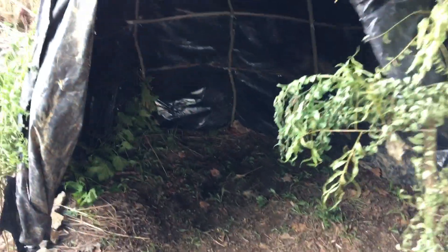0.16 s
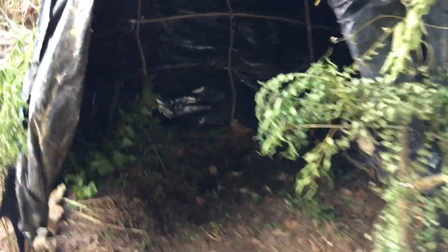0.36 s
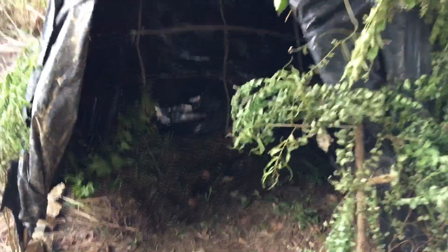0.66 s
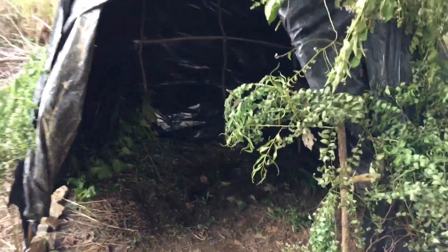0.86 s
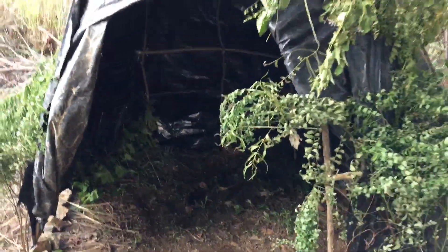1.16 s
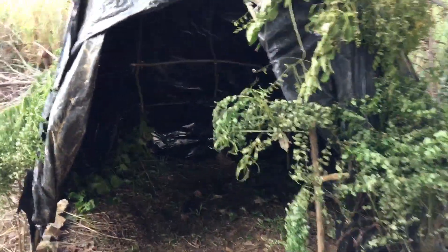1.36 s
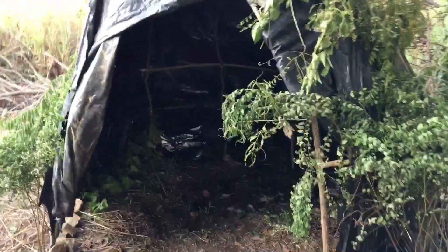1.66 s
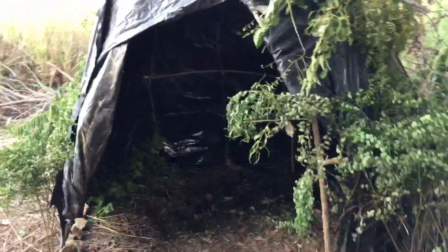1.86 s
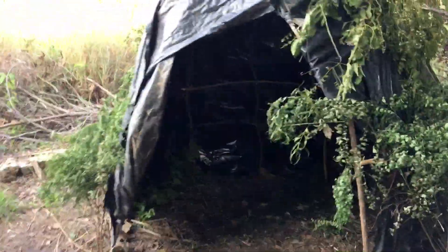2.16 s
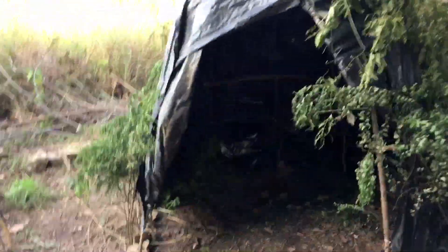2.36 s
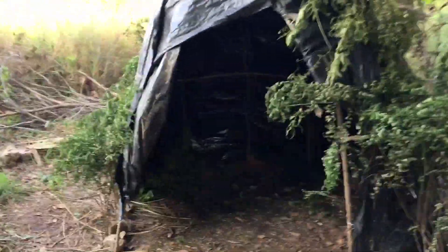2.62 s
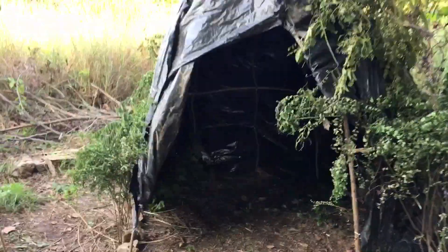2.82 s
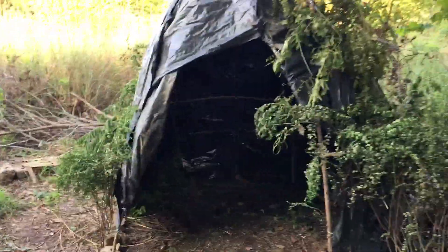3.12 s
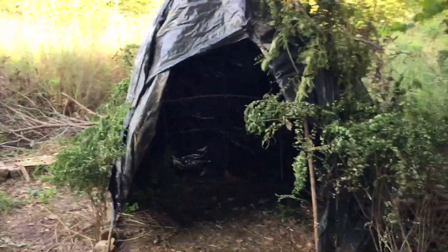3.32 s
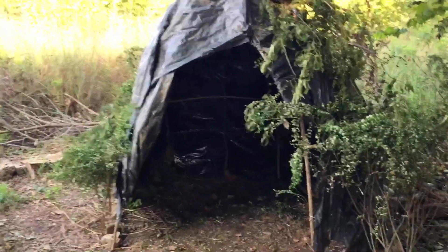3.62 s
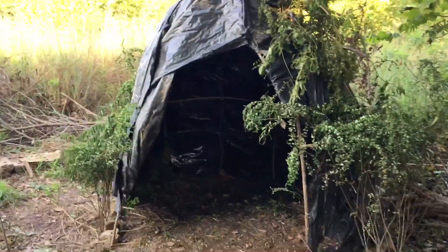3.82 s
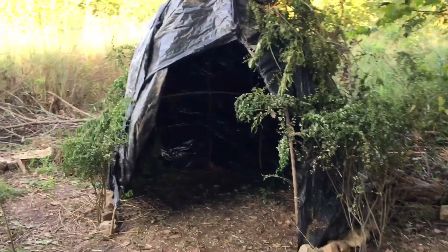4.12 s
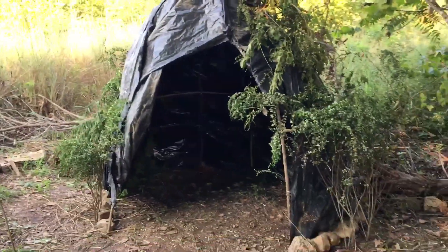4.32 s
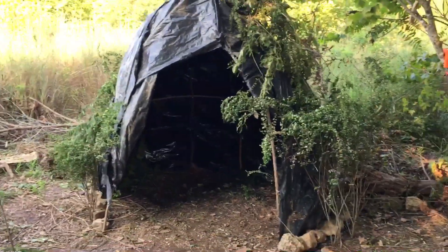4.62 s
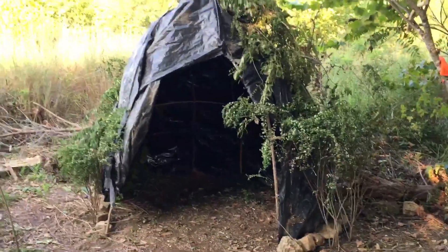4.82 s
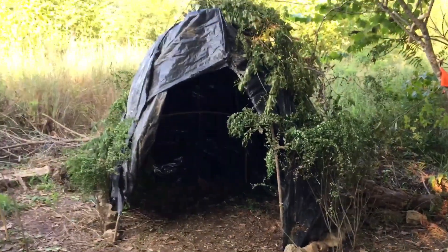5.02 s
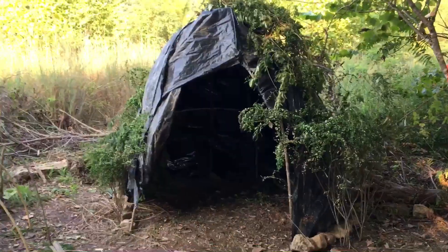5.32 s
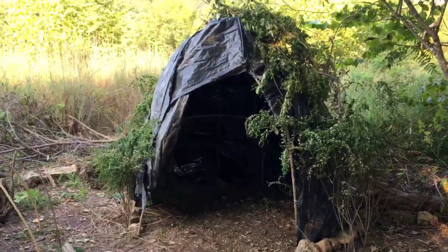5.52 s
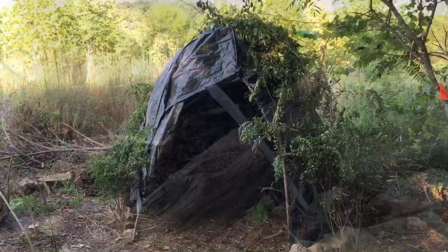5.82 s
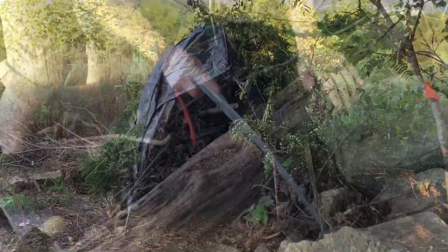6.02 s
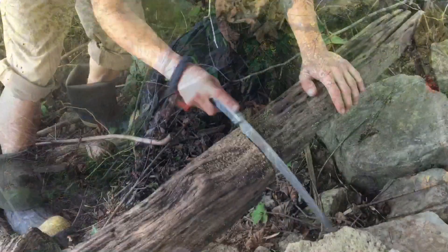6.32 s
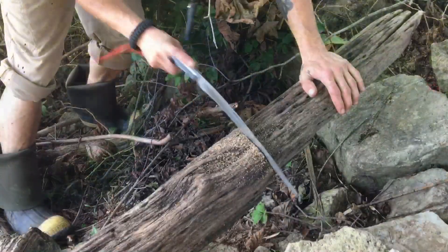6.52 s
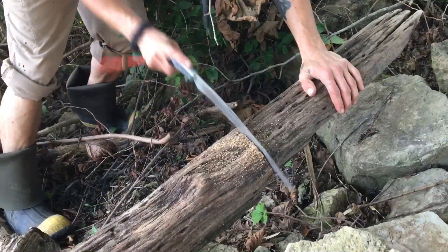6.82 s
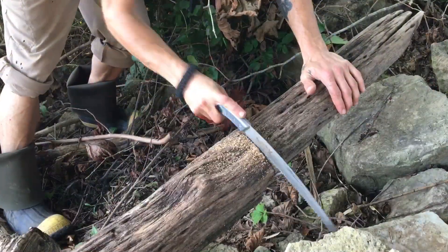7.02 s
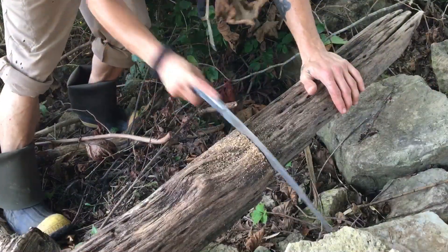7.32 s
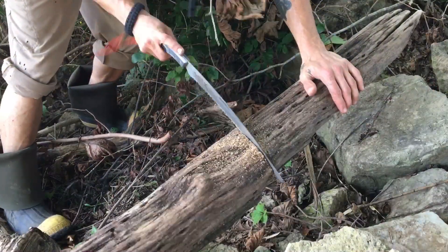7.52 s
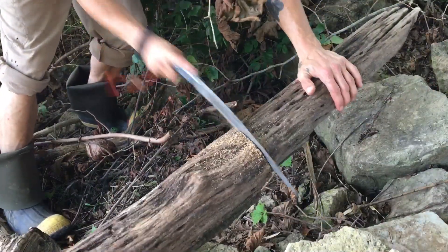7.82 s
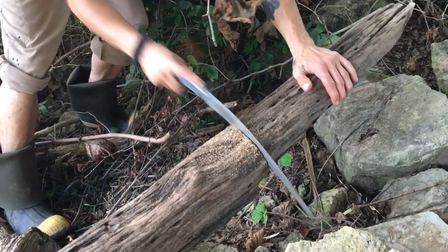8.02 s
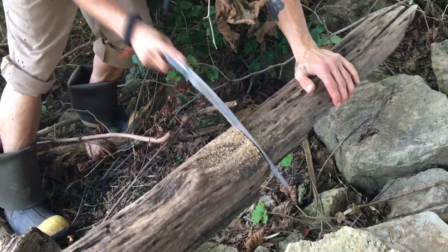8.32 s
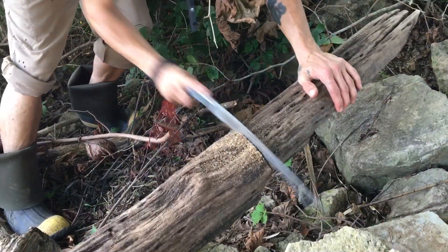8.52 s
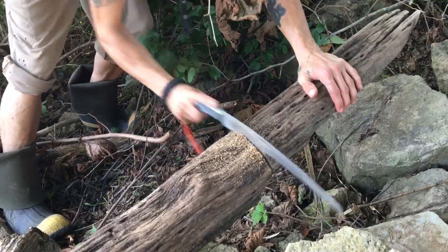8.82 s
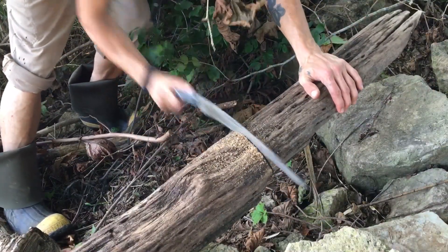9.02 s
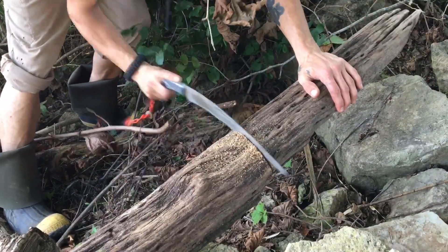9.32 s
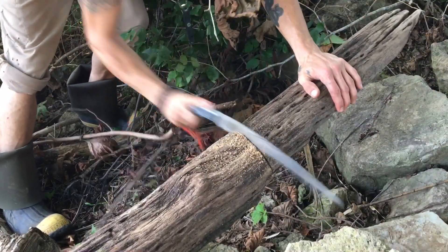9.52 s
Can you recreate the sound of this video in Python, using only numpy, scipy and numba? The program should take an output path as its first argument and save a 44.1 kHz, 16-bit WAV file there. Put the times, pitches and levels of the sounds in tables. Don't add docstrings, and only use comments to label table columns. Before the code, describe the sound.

Boots rustle leaf litter and snap twigs while a far motorbike revs, then a hand saw rasps through a dry log in fast strokes.

```python
import sys
import numpy as np
from scipy import signal
from scipy.fft import rfft, irfft
from scipy.io import wavfile
from scipy.ndimage import uniform_filter1d
from numba import njit

SR = 44100
rng = np.random.default_rng(int(sys.argv[2]) if len(sys.argv) > 2 else 0)


def master_out(mix):
    frames = np.transpose(np.atleast_2d(mix))
    ceiling = np.clip(frames, -1, 1)
    pcm = np.round(ceiling * 32767).astype(np.int16)
    wavfile.write(sys.argv[1], SR, pcm)


def rack_gain(trim_db):
    fader = np.asarray(trim_db, float)
    return 10 ** (fader / 20)


N = 426006
SHORE_FROM_S = 5.672

# teeth bite at t/s, held/s, cutting level/dB, change while held/dB, fine tearing/dB
PULLS = [(5.736, 0.069, -34.5, -7.5, -1.5), (6.122, 0.078, -37, -4, -4), (6.473, 0.065, -31, -4.5, -2),
         (6.806, 0.086, -33.5, -2.5, -2.5), (7.19, 0.069, -29.5, -8, -2), (7.488, 0.078, -33.5, -2.6, -2.5),
         (7.866, 0.072, -30.5, -4, -5), (8.272, 0.063, -33, -4, -5.5), (8.6, 0.068, -30, -3, -4),
         (8.925, 0.072, -32, -0.1, -6), (9.283, 0.069, -32, -1, 0), (9.616, 0.057, -31.5, -1, -2.5)]
PUSHES = [(5.64, 0.018, -40, -1.5, 7), (5.934, 0.053, -41.5, -0.5, -2.5), (6.328, 0.036, -35, -0.5, -5),
          (6.654, 0.048, -37.5, 0.9, -5.5), (7.02, 0.037, -34.5, 2, -5), (7.37, 0.03, -38, 1, -7),
          (7.714, 0.054, -34, -7, -6), (8.08, 0.054, -38, -3, -6.5), (8.435, 0.047, -39.5, 6.5, -5.5),
          (8.78, 0.041, -38.5, 2, -3.5), (9.12, 0.052, -38, 1, 1), (9.46, 0.05, -39, 5, -0.5)]
# press-in/s, lift-off/s
PULL_EASE = [(0.079, 0.041), (0.096, 0.04), (0.077, 0.036), (0.07, 0.055), (0.065, 0.032), (0.04, 0.038),
             (0.064, 0.028), (0.069, 0.034), (0.073, 0.055), (0.057, 0.046), (0.063, 0.052), (0.062, .03)]
PUSH_EASE = [(.09, 0.055), (.09, 0.1), (.09, 0.067), (.09, 0.069), (.09, 0.063), (.09, 0.071), (.09, 0.057),
             (.09, 0.052), (.1, .08), (.09, 0.061), (.09, 0.076), (.09, 0.059)]
# t/s, extra level/dB
CATCHES = [(5.673, 13), (5.703, 16), (5.901, 4), (5.93, 6), (6.095, 4), (6.119, 7), (6.434, 11), (6.449, 6),
           (6.471, 5), (6.77, 14), (6.783, 8), (6.991, 5), (7.169, 6), (7.184, 6), (7.193, 0), (7.832, 4),
           (7.854, -7), (7.866, 2), (7.475, 0), (7.485, 1), (8.234, 9), (8.251, -8), (8.272, -3),
           (8.573, 7), (8.597, 2), (8.753, 12), (8.909, 4), (8.92, 4), (9.104, 3), (9.128, -2), (9.181, 6),
           (9.265, 6), (9.288, 3), (9.314, 4), (9.471, 4), (9.602, 1), (9.613, 4)]
# f/Hz, level per Hz/dB
RASP_COLOUR = [(120, -25), (200, 0.5), (281, -12.5), (379, -2), (497, -8), (620, -4.5), (820, -1.5),
               (1030, 2), (1150, -5.5), (1450, 0.5), (1920, -2.5), (4920, -18), (6000, -10), (7800, -22),
               (13200, -120)]
# f/Hz, level per Hz/dB
TEAR_COLOUR = [(2650, -6), (4500, -4), (4920, -7), (5960, -1.5), (7690, -4.5), (9210, 0), (10400, -3),
               (11700, -0.5), (15100, -7), (16000, 5)]
# f/Hz, width/Hz, level/dB
LOG_MODES = [(1050, 30, -16), (1383, 110, -11.5), (2600, 170, -7), (3620, 310, -13.5)]
# t/s, length/s, f/Hz,
# width/Hz, level/dB
SAW_RINGS = [(5.755, 0.021, 3730, 200, -44), (6.13, 0.03, 1970, 200, -40.5),
             (6.495, 0.027, 2310, 150, -38), (6.52, 0.044, 1070, 90, -46), (6.52, 0.042, 3380, 120, -54),
             (6.675, .04, 1050, 90, -53), (6.81, 0.028, 1980, 200, -42), (6.845, .035, 2650, 150, -40),
             (7.1138, .007, 4080, 350, -35), (7.167, 0.015, 1050, 300, -34),
             (7.18, 0.022, 1640, 300, -33), (7.485, 0.026, 980, 120, -41.5),
             (7.53, 0.035, 3930, 150, -43), (7.99, 0.02, 300, 250, -45), (7.905, 0.038, 3950, 120, -44),
             (8.31, .04, 3930, 120, -47), (8.575, 0.056, 1720, 199, -38), (8.8, 0.025, 5960, 500, -40),
             (8.828, 0.014, 5180, 200, -42), (8.915, 0.023, 1510, 200, -36.5),
             (9.15, 0.044, 865, 121, -45), (9.285, 0.017, 826, 120, -39), (9.305, 0.022, 1950, 200, -41),
             (9.33, 0.025, 1020, 120, -39), (9.35, .02, 1350, 150, -40), (7.53, 0.033, 360, 100, -42),
             (8.45, 0.023, 387, 120, -45), (8.655, 0.031, 377, 120, -41.5)]
# t/s, peak level/dB, f/Hz, t60/s, crack level/dB
KNOCKS = [
    (5.027, -36, 583, 0.029, 8),
    (5.036, -42, 344, 0.053, 10),
    (5.095, -32.5, 450, 0.037, 8),
    (5.107, -43, 604, 0.069, 6),
    (5.673, -60, 386, 0.011, 12),
    (7.1135, -31.5, 790, 0.011, 11),
    (8.523, -30.5, 330, 0.03, 19),
]

# loudest at t/s, level/dB, top above it/dB, swell/s, fade/s (both over 30 dB)
SCUFFS = [(0, -48, -10.5, .01, 0.38), (.1, -53, -5.5, 0.33, 0.21), (.2, -62, -7, .3, .09),
          (.41, -57, -19, 0.047, 0.071), (.594, -62.5, -22, 0.12, 0.13), (.988, -62, -7, .1, 0.14),
          (1.172, -69, -22, .11, .08), (1.42, -65, -14, 0.1, 0.18), (1.85, -59, -6.5, 0.15, 0.19),
          (2.13, -66, -7, .04, 0.24), (2.441, -35, -11.5, 0.086, 0.095), (2.6, -69, -6, 0.25, 4.1),
          (3.19, -59, -15, 0.096, 0.51), (3.232, -62, -12, .04, 0.09), (3.31, -57.5, -14, 0.089, .2),
          (3.355, -57.5, -14, 0.16, 0.31), (3.475, -50.5, -14, 0.094, 0.36), (3.545, -44, -12, 0.098, 0.11),
          (3.615, -60, -8, .08, .08), (4.06, -59.5, -7, 0.12, 0.17), (4.13, -61.5, -11, 0.11, 0.14),
          (4.225, -58, -12, 0.075, .2), (4.26, -58, -9, .1, 0.14), (4.33, -61.5, -12, .1, 0.11),
          (4.392, -58.5, -3, 0.053, 0.14), (4.425, -56, -5, 0.11, 0.15), (4.486, -60.5, -4, .05, 0.16),
          (4.78, -70, -6, .4, .4), (5.026, -60, 0, 0.015, .2), (5.118, -60, -2, 0.23, 0.15)]
# t/s, peak level/dB, f/Hz, t60/s
TWIGS = [(0.184, -43, 302, 0.011), (0.395, -53, 350, 0.033), (0.434, -41, 493, 0.011),
         (1.013, -53.5, 785, 0.058), (1.569, -47.5, 480, 0.029), (1.588, -49, 444, 0.034),
         (1.721, -33.5, 540, 0.013), (1.753, -35.5, 563, 0.017), (1.767, -46, 480, 0.019),
         (1.786, -39.5, 545, 0.016), (1.811, -52, 500, .012), (1.952, -47, 333, 0.1),
         (2.795, -44.5, 880, 0.036), (3.842, -51.5, 920, 0.056)]
HOLLOW_WOOD = [(0.574, -45, 604, 0.033), (2.363, -46.5, 634, 0.05), (2.847, -34.5, 626, 0.044),
               (3.129, -33.5, 650, 0.023), (3.16, -55, 697, 0.051), (3.488, -47.5, 624, 0.042),
               (3.55, -50, 505, .04), (3.835, -52, 583, .04), (4.124, -49, 467, 0.057),
               (4.152, -47, 593, 0.051), (4.152, -47, 313, .05), (4.515, -50, 590, 0.036),
               (4.73, -50, 696, 0.062), (4.803, -46.5, 663, 0.043), (4.983, -44.5, 790, 0.022),
               (5.146, -40, 488, 0.042), (5.153, -46, 418, .04), (5.203, -50, 860, 0.05)]
STALKS = [(0.309, -57, 1550, 0.023), (0.4356, -47, 1720, 0.011), (0.5975, -47, 2390, 0.0096),
          (1.8118, -48, 3620, 0.017), (2.1394, -61, 2500, 0.02), (2.6526, -52, 2000, 0.014),
          (2.7327, -50, 2250, 0.022), (2.826, -43, 3540, 0.0039), (2.8604, -48, 2150, 0.011),
          (2.9634, -51.5, 2050, 0.017), (3.052, -45.5, 2310, 0.014), (3.181, -36.5, 2740, 0.0066),
          (3.231, -59, 2300, 0.011), (3.469, -53, 2480, .012), (3.537, -44, 4040, 0.018),
          (4.0053, -46, 2570, 0.01), (4.064, -43.5, 2520, 0.014), (4.132, -53, 2500, .012),
          (4.218, -59, 1926, 0.013), (4.25, -53, 2814, .012), (4.3117, -55, 2540, .012),
          (4.384, -54, 3210, .012), (5.145, -50, 1449, 0.054), (4.2787, -52, 2930, 0.021),
          (4.4796, -51, 3500, 0.016), (4.6369, -58, 3214, 0.031), (4.7282, -49, 1820, 0.013),
          (7.8037, -42, 2830, 0.011), (9.397, -41, 2200, .012), (8.205, -48, 1690, 0.02),
          (8.7333, -42, 1950, 0.015)]
LEAF_EDGES = [(3.354, -58, 12000, .01), (3.474, -62, 10900, 0.009), (3.615, -62, 11000, 0.0099),
              (4.005, -53, 11800, .012), (4.048, -58, 11100, 0.012), (4.138, -60, 12070, 0.0088),
              (4.219, -59, 11500, 0.0097), (4.3117, -57, 10400, .01), (4.395, -57, 12500, .02),
              (4.42, -59, 11500, .015), (4.48, -55, 10990, .015)]
# t/s,
# length/s, f/Hz, width/Hz, level/dB
BRIEF_RUBS = [(0, .09, 1400, 500, -53), (.05, .25, 1400, 700, -62), (0, .18, 630, 250, -55),
              (1.82, .06, 3750, 600, -62), (1.06, .095, 1400, 500, -67), (1.153, .073, 1370, 500, -62),
              (1.153, .031, 2350, 250, -65), (1.365, .075, 2100, 250, -70), (2.44, .03, 2400, 600, -44),
              (2.672, .044, 1580, 150, -64), (2.672, .045, 1900, 200, -65), (2.7, .07, 2280, 200, -66),
              (2.735, .07, 1550, 130, -69), (4, .4, 4500, 450, -74), (4.8, .5, 1140, 900, -64.5),
              (5.22, .45, 1200, 600, -68), (5.17, .5, 4650, 400, -73), (5.2, .47, 3950, 250, -80),
              (5.715, .09, 175, 70, -47), (5.98, .05, 130, 70, -45), (8.982, .022, 990, 170, -38)]
# t/s, peak level/dB, f/Hz
HEELS = [(0.56, -49, 60.5), (1.56, -53, 306), (1.95, -36.5, 103), (1.96, -51.5, 270), (2.069, -46, 107),
         (2.395, -33.5, 49), (2.429, -43.5, 128), (2.839, -49, 157.6), (3.107, -41, 181),
         (3.479, -41, 65.6), (5.197, -48, 82), (5.449, -46, 72.7), (5.718, -46, 93.5), (5.969, -37.5, 176),
         (7.981, -48, 173), (8.999, -39.5, 76), (9.122, -43, 121)]

# t/s, firing rate f/Hz, firing tone level/dB, octave level/dB
BIKE = [(2.451, 64.7, -44, -59), (2.6, 75.7, -65, -57.5), (2.83, 76.94, -62.5, -55),
        (3.149, 74.65, -53, -54), (3.48, 69.05, -58, -61.5), (3.58, 76.7, -45, -46), (3.69, 89, -50, -45),
        (3.73, 88, -35, -58), (3.83, 112, -53, -53.5), (4.03, 129.8, -56, -53), (4.2, 116.9, -58, -57),
        (4.42, 101.5, -56, -54.5), (4.55, 90.3, -55, -64), (4.85, 66.3, -66, -63)]
# multiple of the firing rate, level re octave/dB
UNEVEN_TONES = [(0.751, -11), (1.25, -2), (1.5, -1.5), (3, -6)]
# f/Hz, level per Hz/dB
RUMBLE_COLOUR = [(25, -60), (40, -1), (60, 0), (100, 0.5), (160, -6.5), (250, -16), (400, -24.5),
                 (800, -32)]
STILL_COLOUR = [(200, 4.5), (500, -1.5), (1100, -2.5), (1700, -8), (2200, -13), (4000, -14), (9300, -10.5),
                (10300, -25), (11300, -18.5), (16000, -14.5)]
INSECT_COLOUR = [(5600, -92), (6300, -13), (6800, -0.5), (7300, -1.5), (7800, -4), (8400, -15),
                 (9300, -34.5)]
# f/Hz, level/dB
HUM = [(81, -68), (156, -54), (205, -58)]


def unit(x):
    return x / np.sqrt(np.mean(x ** 2))


def shaped(x, points):
    hz, db = np.transpose(points)
    f = np.maximum(np.arange(N // 2 + 1) * SR / N, 1)
    gain_db = np.interp(np.log(f), np.log(hz), db, left=-90, right=-90)
    return unit(irfft(rfft(x) * rack_gain(gain_db), N))


def track(table):
    s, *columns = np.transpose(table)
    return [np.interp(np.arange(N) / SR, s, c) for c in columns]


def slowly(shape):
    ms = np.arange(0, N / SR + .002, .001)
    return [np.interp(np.arange(N) / SR, ms, row) for row in shape(ms)]


@njit
def svf(x, hz, width):
    y, b, l, g, k = np.empty(len(x)), 0., 0., 0., 0.
    for i in range(len(x)):
        if i == 0 or hz[i] != hz[i - 1]:
            g, k = np.tan(np.pi * hz[i] / SR), width / hz[i]
        v = (b + g * (x[i] - l)) / (1 + g * (g + k))
        b, l, y[i] = 2 * v - b, l + 2 * g * v, k * v
    return y


def mode(x, hz, width):
    return svf(x, np.full(len(x), float(hz)), float(width))


def double_mode(x, hz, width):
    return unit(mode(mode(x, hz, width), hz, width))


def walk(rate):
    hold, n = max(int(SR / 8 / rate), 10), N // 8 + 1
    levels = rng.standard_normal(N // 64)[:n // hold + 1]
    held = np.repeat(levels, hold)[:n]
    slewed = uniform_filter1d(uniform_filter1d(held, hold), hold)
    return np.repeat(1.287 * slewed, 8)[:N]


def grains(per_s, spread_db):
    present, sign, size = rng.random((3, N))
    return (present < per_s / SR) * np.sign(sign - .5) * rack_gain(-spread_db * np.log(1.001 - size))


def saw():
    cut_db, bites_db, slack_db, tear_db, thump_db, blade_hz = strokes()
    judder_db = 0.59 * walk(70) + 0.56 * walk(260)
    teeth = unit(grains(7000, 2.67)) * rack_gain(judder_db)
    rasp = shaped(teeth, RASP_COLOUR)
    patches = sum(rack_gain(4.0 * walk(70)) * mode(rasp, hz, .3 * hz) for hz in 500 * 1.35 ** np.arange(9))
    drive = rack_gain(0.67 * (cut_db + 21.0))
    body = rack_gain(-6.5 - 0.76 * bites_db) * rasp + rack_gain(-11.0) * unit(patches)
    body += drive * (rack_gain(2.5) * blade(teeth, blade_hz) + log_ring(teeth))
    thump_level_db = thump_db - 1.0 - .8 * bites_db + 0.95 * walk(30)
    body += rack_gain(thump_level_db) * unit(mode(teeth, 360, 96))
    pressing_in = uniform_filter1d(1. * (np.gradient(slack_db) > 0), size=400)
    tear_db -= 0.019 * np.clip(slack_db, -20, 0) * pressing_in
    fine_db = tear_db + 2.5 - 0.011 * np.maximum(slack_db, -18)
    cutting = rack_gain(cut_db) * (body + rack_gain(fine_db) * tearing(judder_db))
    return (np.arange(N) / SR > SHORE_FROM_S) * (trickle() + cutting) + scrapes(SAW_RINGS)


def strokes():
    rows = []
    # log thump/dB, free blade ring at start and end f/Hz
    for table, thump_db, start_hz, end_hz in ((PULLS, -46, 1690, 2120), (PUSHES, -57, 2800, 1900)):
        for s, held, db, change, tear_db in table:
            top = db + max(change, 0)
            rows.append((s - .02, top, tear_db, thump_db - top, start_hz))
            rows.append((s + held + .02, top, tear_db, thump_db - top, end_hz))
    top_db, *colour = track(sorted(rows))
    cut_db, bites_db = slowly(pressing)
    return cut_db + bites_db, bites_db, cut_db - top_db, *colour


def pressing(t):
    pressure = np.full(len(t), .01)
    for table, ease in ((PULLS, PULL_EASE), (PUSHES, PUSH_EASE)):
        for (s, held, db, change, _), (press, lift) in zip(table, ease):
            times = [s - press, s, s + held, s + held + lift]
            force = [0, rack_gain(db / 2), rack_gain((db + change) / 2), 0]
            pressure = np.maximum(pressure, np.interp(t, times, force))
    skips = [(5.7205 + k * .01165, 8.5) for k in range(7)]
    bites_db = np.zeros(len(t))
    for s, db in CATCHES + skips:
        away = np.abs(t - s)
        bites_db += db * np.where(t > s, np.exp(-away / 0.0032), -.8 * np.exp(-away / 0.0048))
    pressure = uniform_filter1d(pressure, size=15)
    return 40 * np.log10(pressure), bites_db


def blade(teeth, blade_hz):
    free_hz = blade_hz * (1.03 + 0.075 * walk(60))
    ring = unit(svf(svf(teeth * rack_gain(2.5 * walk(140)), free_hz, 970.0), free_hz, 2250.0))
    second_hz = blade_hz * (1.67 + 0.066 * walk(30))
    ring += rack_gain(-17.0) * unit(svf(teeth * rack_gain(0.71 * walk(110)), second_hz, 360.0))
    third_hz = blade_hz ** 2 / 1130
    ring += rack_gain(-17) * unit(svf(teeth * rack_gain(6.0 * walk(50)), third_hz, 500.))
    return ring


def log_ring(teeth):
    out = np.zeros(N)
    for hz, width, db in LOG_MODES:
        ring = svf(teeth, hz * (1 + 0.031 * walk(20)), float(width))
        out += rack_gain(db + 0.75 * walk(40)) * unit(mode(ring, hz, .5 * hz))
    return out


def tearing(judder_db):
    dust = shaped(unit(grains(16000, 3.15)) * rack_gain(0.64 * judder_db + 1.6 * walk(73)), TEAR_COLOUR)
    patches = sum(rack_gain(4.5 * walk(60)) * mode(dust, hz, .16 * hz) for hz in 3300 * 1.22 ** np.arange(8))
    return unit(.6 * dust + patches)


def trickle():
    heap_db = np.interp(np.arange(N) / SR, [SHORE_FROM_S, 8.9, 9.3], [-60, -60, -53]) + 2.8 * walk(24)
    colour = [(1200, -26), (2500, -6), (4500, -8), (7000, -9), (9000, -11), (13000, -12), (16000, -18)]
    return rack_gain(heap_db) * shaped(grains(3000, 3.8), colour)


def scrapes(table):
    out = np.zeros(N)
    settle = 2048
    for (s, length, hz, width, db), noise in zip(table, rng.standard_normal((30, SR // 2 + settle))):
        n, i = int(length * SR), int(s * SR)
        rub = double_mode(noise[:n + settle].copy(), hz, 0.93 * width)[-n:]
        out[i:i + n] += rack_gain(db) * rub * signal.windows.tukey(n, .4)
    return out


def snaps(events, glide_hz, rough_share, swell_s, crack_db=-60):
    size = 8192
    out, t = np.zeros(N + size), np.arange(size) / SR
    swell = np.minimum(t / swell_s, 1) ** 2
    for (s, db, hz, t60, *own_crack_db), noise in zip(events, rng.standard_normal((len(events), size))):
        decay = np.exp(-np.log(1000) * np.maximum(t - swell_s, 0) / max(t60, .005)) * swell
        falling_hz = hz + glide_hz * np.exp(-(t / 0.0031) ** 2)
        ring = np.sin(2 * np.pi * np.cumsum(falling_hz) / SR)
        rough = double_mode(noise, hz, 1.4 * hz)
        crack = mode(noise[::-1].copy(), 2600, 5600) * np.exp(-t / 0.0025) * swell
        ground = 0.45 * np.sin(2 * np.pi * min(0.416 * hz, 300) * t)
        crack_gain = rack_gain(max(crack_db, *own_crack_db, -60) + 3.5)
        i = int(s * SR)
        out[i:i + size] += rack_gain(db) * (decay * (ring + ground + rough_share * rough) + crack_gain * crack)
    return out[:N]


def boots():
    twigs = snaps(TWIGS, 1054, 0.71, 0.0027, crack_db=-19)
    hollow = snaps(HOLLOW_WOOD, 77, 0.35, 0.0027)
    stalks = snaps(STALKS, 97, 0.81, 0.0012, crack_db=-9.0)
    leaf_edges = snaps(LEAF_EDGES, 100, 1.61, .0005)
    return litter() + twigs + hollow + stalks + leaf_edges + scrapes(BRIEF_RUBS)


def litter():
    crush, fine = slowly(scuffing)
    leaves = unit(grains(5000, 2.5)) * rack_gain(1.84 * walk(90) + 1.6 * walk(25.03))
    mid = shaped(leaves, [(200, -3), (450, -4.5), (1000, -3.0), (1600, 1.0), (2400, 4.0), (4500, 0.0),
                          (6500, -8.5), (9000, -33)])
    top = shaped(leaves, [(5000, -9), (8000, 4.5), (11000, 0.0), (15000, 0.5), (16500, -39)])
    return (np.arange(N) / SR < SHORE_FROM_S) * (crush * mid + rack_gain(6.0) * fine * top)


def scuffing(t):
    coarse_db, fine_db = [], []
    for s, db, top_db, swell, fade in SCUFFS:
        level_db = db - 30 * np.where(t < s, (s - t) / swell, (t - s) / fade)
        coarse_db.append(level_db)
        fine_db.append(level_db + top_db)
    return rack_gain(np.max(coarse_db, axis=0)), rack_gain(np.max(fine_db, axis=0))


def thuds():
    out, t = np.zeros(N), np.arange(4096) / SR - .02
    for s, db, hz in HEELS:
        i = int((s - .02) * SR)
        out[i:i + 4096] += rack_gain(db) * np.exp(-((t - .02) / 0.0099) ** 2) * np.sin(2 * np.pi * hz * t)
    return out


def bike():
    hz, first_db, octave_db = track(BIKE)
    t = np.arange(N) / SR
    phase = 2 * np.pi * np.cumsum(hz * (1 + 0.012 * walk(24.98))) / SR
    tones = rack_gain(first_db) * np.sin(phase)
    tones += rack_gain(octave_db - 1.0 + 1.5 * walk(10)) * np.sin(2 * phase)
    for order, db in UNEVEN_TONES:
        silencer_db = -7.2 * ((order * hz - 181) / 52) ** 2
        tones += rack_gain(octave_db + db + 3.7 * walk(5.55) + silencer_db) * np.sin(order * phase)
    puffs = (1 + np.sin(phase)) ** 2 * rng.standard_normal(N)
    tones += rack_gain(-74.5 + 2.0 * walk(5.4)) * double_mode(puffs, 650, 170)
    revving = np.clip((hz - 70) / 30, 0, 1)
    lower_pipe = unit(mode(mode(puffs, 520, 280), 520, 270))
    tones += rack_gain(-70.0 + 2.0 * walk(7.9)) * revving * lower_pipe
    fade = np.clip(np.minimum(t - BIKE[0][0], BIKE[-1][0] - t) / 0.063, 0, 1)
    return np.sqrt(2) * tones * fade


def air():
    t = np.arange(N) / SR
    thicket = t < SHORE_FROM_S
    road = np.exp(-((t - 3.54) / 1.86) ** 2)
    lull = np.exp(-(t - 7.65) ** 2)
    rumble_db = np.where(thicket, -56 + 5 * road, -48.5)
    insects_db = np.where(thicket, -52 + 2 * road, -48.5) - 6 * lull
    still_db = np.where(thicket, -61.5 - 5 * road, -53.5)
    rumble = rack_gain(rumble_db + 0.88 * walk(16.0)) * shaped(rng.standard_normal(N), RUMBLE_COLOUR)
    wings = rng.standard_normal(N) * rack_gain(1.0 * walk(200))
    insects = rack_gain(insects_db + .5 * walk(2.68)) * shaped(wings, INSECT_COLOUR)
    still = rack_gain(still_db + 1.1 * walk(3.72)) * shaped(rng.standard_normal(N), STILL_COLOUR)
    throb = 0.28 + np.exp(-((66 * t + .3 * walk(4)) % 1) / 0.53)
    cricket = rack_gain(-67.5 + 0.4 * walk(3.0)) * unit(mode(throb * rng.standard_normal(N), 5700, 440))
    hum = np.zeros(N)
    for hz, db in HUM:
        phase = 2 * np.pi * np.cumsum(hz * (1 + 0.0143 * walk(7))) / SR
        hum += rack_gain(db + 2.9 * walk(5)) * np.sin(phase)
    return rumble + insects + still + cricket + hum * np.clip((t - SHORE_FROM_S) / .5, 0, 1)


def scene():
    near = saw() + boots() + snaps(KNOCKS, 1500, 0.91, 0.0023)
    t = np.arange(4000) / SR
    rocks = rng.standard_normal(4000) * np.exp(-np.log(1000) * t / 0.13) * (t > .003)
    reflections = rack_gain(-36.0) * signal.fftconvolve(near, rocks)[:N]
    return (near + reflections + thuds() + bike() + air())[None]


def low_pass(x):
    return signal.sosfilt(signal.butter(12, 16520, fs=SR, output="sos"), x)


def record(dry):
    rounded = np.tanh(4 * dry) / 4
    low_cut = signal.butter(4, 36, "high", fs=SR, output="sos")
    top_cut = signal.ellip(10, .3, 70, 15830, fs=SR, output="sos")
    mix = signal.sosfilt(np.vstack([low_cut, top_cut]), rounded)
    return low_pass(mix)


dry = scene()
out = record(dry)
master_out(out)
```